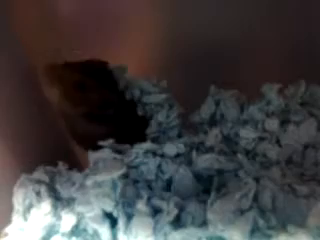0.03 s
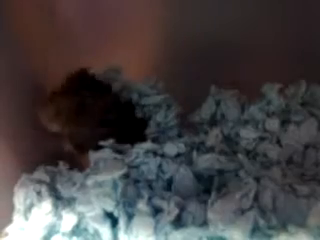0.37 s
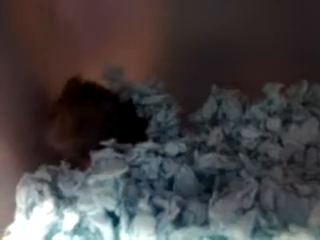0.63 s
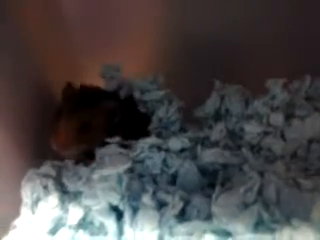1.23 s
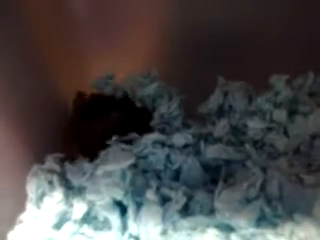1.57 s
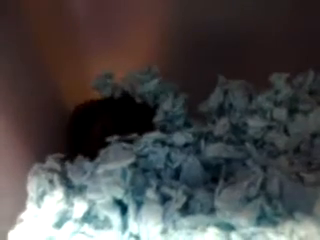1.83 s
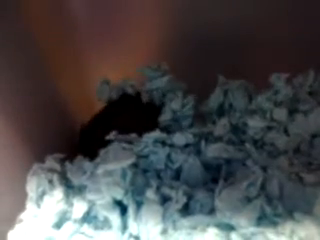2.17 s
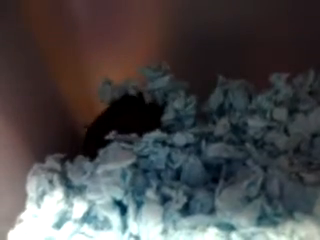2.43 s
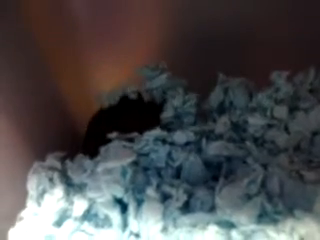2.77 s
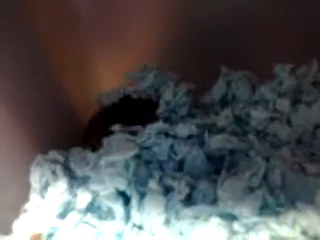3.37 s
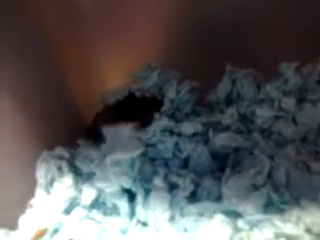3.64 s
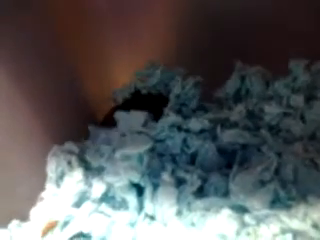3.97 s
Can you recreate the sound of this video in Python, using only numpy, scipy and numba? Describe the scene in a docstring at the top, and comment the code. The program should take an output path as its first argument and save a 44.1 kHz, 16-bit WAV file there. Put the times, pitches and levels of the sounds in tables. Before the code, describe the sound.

A hamster squawks nine times in quick succession, close to the microphone. The reedy calls crack into a rattle and grow duller and hoarser, the last one short. Tiny squeaky gasps fall between them in a quiet room.

```python
"""A hamster in paper bedding squawks nine times, close up; the later calls are duller and hoarser,
and the last is short. Its voice is a pulse train that breaks from a reedy tone into a slower rattle,
with air hissing once a cycle, shaped by its throat and mouth and by echoes off the near cage walls.
It squeaks briefly as it gasps between calls, over a quiet room."""
import sys
import numpy as np
from scipy import signal
from scipy.fft import rfft, irfft
from scipy.io import wavfile
from scipy.ndimage import uniform_filter1d
from numba import njit

SR = 44100
rng = np.random.default_rng(int(sys.argv[2]) if len(sys.argv) > 2 else 0)


def unload_audio(sound):
    """Save the sound as a 16-bit wav file, at the path given as the first command line argument."""
    columns = np.transpose(np.atleast_2d(sound))
    # keep every value between -1 and 1, then stretch to whole-number steps
    steps = np.round(np.clip(columns, -1, 1) * 32767)
    wavfile.write(sys.argv[1], SR, steps.astype(np.int16))


N = 176400
t = np.arange(N) / SR
TOP_HZ = 7350  # upper edge of the breath and of the whole mix


def undb(db):
    """Decibels to gain."""
    return 10 ** (np.asarray(db) / 20)


def unit(x):
    """Scale to rms 1."""
    return x / np.std(x)


def steady(x):
    """Ride the level to rms 1 over a sliding 12 ms."""
    return x / np.sqrt(uniform_filter1d(x * x, size=530) + 1e-12)


def wander(rate_hz):
    """Smooth random modulation, rms 1."""
    span = max(int(SR / rate_hz), 1)
    smoothed = uniform_filter1d(rng.standard_normal(N), span, mode="wrap")
    return unit(uniform_filter1d(smoothed, span, mode="wrap"))


def equalise(x, points):
    """Minimum-phase EQ through the given (Hz, dB) points."""
    hz, db = np.array(points, float).T
    bins_hz = np.maximum(np.fft.rfftfreq(N, 1 / SR), 1)
    gain = undb(np.interp(np.log(bins_hz), np.log(hz), db))
    cepstrum = irfft(np.log(gain))
    cepstrum[1:N // 2] *= 2
    cepstrum[N // 2 + 1:] = 0
    return irfft(rfft(x) * np.exp(rfft(cepstrum)))


def butter(x, hz, kind, order=2):
    """Low- or high-pass without delay."""
    return signal.sosfiltfilt(signal.butter(order, hz, kind, fs=SR, output="sos"), x)


@njit
def resonate(x, hz, width):
    """Swept band-pass, gain 1 at the centre."""
    y = np.empty(len(x))
    band_state, low_state = 0., 0.
    for i in range(len(x)):
        tuning, damping = np.tan(np.pi * hz[i] / SR), width[i] / hz[i]
        band = (band_state + tuning * (x[i] - low_state)) / (1 + tuning * (tuning + damping))
        band_state = 2 * band - band_state
        low_state += 2 * tuning * band
        y[i] = damping * band
    return y


# The tilt of the room tone. Each row: frequency in Hz, relative level in dB.
ROOM_EQ = [(25, 4.5), (155, -2), (220, -9), (700, -9), (7000, -45.5)]


def room(level_db=-51):
    """A faint bed of rumble and hiss."""
    return undb(level_db) * unit(equalise(rng.standard_normal(N), ROOM_EQ))


# The gasps around the calls. Each row: midpoint in seconds, length in seconds, pitch in Hz, level in dB.
GASPS = [(0.467, .013, 411, -32), (1.017, 0.025, 496, -27.5), (1.581, 0.056, 1050, -39),
         (1.582, 0.015, 320.4, -32.5), (2.007, 0.012, 524, -39), (2.5, 0.027, 549, -25.5),
         (2.894, 0.015, 577, -37), (3.911, .013, 741, -21.5), (3.933, .034, 1310, -40)]


def squeaks(arch=.22, fall=.08, jitter=.09, cutoff_hz=1210):
    """Each gasp is a brief, dull, hoarse chirp whose pitch arches and falls."""
    out = np.zeros(N)
    unrest = jitter * wander(470)
    for middle, length, hz, db in GASPS:
        position = 2 * (t - middle) / length
        near = np.abs(position) < 2
        bend = np.tanh(position[near])
        pitch = hz * (1 - arch * bend ** 2 - fall * bend + unrest[near])
        phase = 2 * np.pi * np.cumsum(pitch) / SR
        note = sum(np.cos(k * phase + k * k) / (1 + (k * hz / cutoff_hz) ** 4) for k in range(1, 10))
        envelope = np.exp(-position[near] ** 4 / 2)
        out[near] += undb(db) * unit(note) * envelope
    return out


def cage(x, echo_db=-7, decay_s=.0025):
    """The near walls add a spray of very short echoes that turns the upper overtones uneven."""
    age = t[:SR // 40]
    echoes = rng.standard_normal(len(age)) * np.exp(-age / decay_s)
    echoes = butter(echoes / np.linalg.norm(echoes), 2300, "high")
    return x + undb(echo_db) * signal.fftconvolve(x, echoes)[:N]


# The throat's resonances as an EQ curve. Each row: frequency in Hz, gain in dB.
THROAT_EQ = [(370, -18), (520, 4.5), (690, 13), (1120, 12.5), (1500, 8.5), (1740, -8.5), (1920, -0.5),
             (2330, -20), (3150, -11.5), (3600, -18.5), (6300, -20.5)]
# The mouth's shrill peak. Each row: time in seconds, centre in Hz, width in Hz, boost in dB.
MOUTH_SWEEP = [(0, 2930, 1500, 9), (.14, 3660, 1300, 14), (.33, 4500, 900, 1), (1.44, 5450, 400, 16),
               (1.698, 4550, 700, 13), (1.948, 4950, 750, 31), (2.3, 3320, 1800, 17.5),
               (3.42, 3730, 1490, 11)]


def vocal_tract(x):
    """Still throat resonances, then a shrill one that moves with the mouth."""
    times, hz, width, db = np.array(MOUTH_SWEEP, float).T
    throat = equalise(x, THROAT_EQ)
    shrill = resonate(throat, np.interp(t, times, hz), np.interp(t, times, width))
    return throat + (undb(np.interp(t, times, db)) - 1) * shrill


def larynx(hz, rough, wobble=.006, lurch=.085, jitter=.12, shimmer=.48, flicker_db=3.2):
    """Pulses and puffs of air; roughness unsettles each cycle's length and size and adds breath."""
    unrest = rough ** 1.5 * (lurch * wander(220) + jitter * wander(900))
    phase = 2 * np.pi * np.cumsum(hz * (1 + wobble * wander(90) + unrest)) / SR
    # Each overtone flickers on its own; the phase offsets smear each pulse over its cycle.
    overtones = sum(np.cos(k * phase + np.pi * k * k / 20) * undb(flicker_db * wander(64))
                    for k in range(2, 20))
    pulses = unit(np.cos(phase) + overtones)
    hiss = butter(rng.standard_normal(N), 3000, "high")
    puffs = unit(butter(hiss, TOP_HZ, "low")) * (1 + np.cos(phase) / 2)
    return pulses * (1 + rough * shimmer * wander(740)) + (.02 + .65 * rough) * puffs


# The reedy tone's melody. Each row: time in seconds, pitch in Hz.
TONE_PITCH = [(0, 546.7), (.05, 556.2), (.068, 502.8), (.21, 590), (.245, 636.6), (.405, 665),
              (.489, 500.2), (.538, 540.5), (.656, 537.7), (.712, 577), (.831, 537), (.921, 633.4),
              (.986, 606.2), (1.064, 541.3), (1.136, 630), (1.435, 663.2), (1.495, 607.6), (1.526, 664.4),
              (1.545, 601), (1.617, 512.1), (1.647, 615.6), (1.722, 572.4), (1.843, 564), (1.915, 661.8),
              (1.981, 652), (2.052, 565.8), (2.188, 544), (2.236, 615), (2.392, 630), (2.425, 694.2),
              (2.47, 644.6), (2.543, 490.3), (2.593, 556), (2.667, 508.2), (2.727, 536), (2.966, 539.4),
              (3.08, 504.2), (3.19, 585.2), (3.235, 581.4), (3.303, 489), (3.392, 522.6), (3.598, 511.6),
              (3.677, 595), (3.75, 514)]
# The rasp on that tone. Each row: time in seconds, roughness from 0 to 1.
TONE_RASP = [(.03, .15), (.13, .36), (.19, .17), (.68, .47), (1.17, .13), (1.44, .05), (1.48, .27),
             (1.8, .22), (2.15, .42), (2.25, .27)]
# Where the voice breaks into a rattle. Each row: start in seconds, end in seconds.
VOICE_BREAKS = [(.407, .425), (.905, .917), (.98, 1.068), (1.539, 1.63), (1.891, 1.901), (1.93, 1.952),
                (1.968, 2.085), (2.354, 2.366), (2.448, 2.563), (2.742, 2.8), (3.07, 3.108), (3.138, 3.166),
                (3.304, 3.425), (3.485, 3.555), (3.743, 3.93)]


def voice(crossfade_s=.005, ducked_gain=.45):
    """The tone ducks as a slower, uneven rattle breaks in; returns the sound and the rattle's fader."""
    hz = np.interp(t, *np.array(TONE_PITCH).T)
    rough = np.interp(t, *np.array(TONE_RASP).T)
    rattling = sum(np.clip(.5 + np.minimum(t - start, end - t) / crossfade_s, 0, 1)
                   for start, end in VOICE_BREAKS)
    tone = larynx(hz, rough) * (1 - (1 - ducked_gain) * rattling)
    rattle = rattling * larynx(hz=360, rough=.87)
    return tone + rattle, rattling


# The level curves of the nine calls, one list per call. Each row: time in seconds, then the levels
# in dB of the fundamental (before the rattle's boost), the low overtones and the treble.
CALL_LEVELS = [
    [(0, -33.5, -36, -27.5), (0.2, -27.5, -37, -27), (0.412, -22.5, -35, -31)],
    [(0.49, -32.0, -36.5, -31.5), (0.83, -30.0, -34.5, -32), (0.91, -24, -38, -31.5),
     (0.987, -25, -39.5, -30.5)],
    [(1.071, -29.5, -31, -30.5), (1.13, -25.5, -38.5, -30), (1.4, -22.5, -42, -31),
     (1.544, -27.5, -36.5, -28.5)],
    [(1.624, -29.5, -34, -34.5), (1.67, -25.0, -33, -27.5), (1.85, -30.5, -29, -37.5),
     (1.98, -23, -33.5, -42)],
    [(2.056, -32.5, -29.5, -52), (2.24, -28.0, -27, -39.5), (2.467, -27, -27, -31.5)],
    [(2.551, -36, -27, -32.5), (2.765, -36, -29.5, -42)],
    [(2.915, -35, -32.5, -49.5), (3.05, -39, -31.5, -51.5), (3.21, -30, -26, -44.5),
     (3.315, -35, -35, -51.5)],
    [(3.388, -32.5, -35, -40.5), (3.52, -37.5, -30.5, -52.5), (3.68, -31.5, -27, -44),
     (3.794, -34, -31, -52.5)],
    [(3.857, -35.5, -31.5, -53), (3.912, -48.5, -29.5, -49.5)],
]


def squawks(attack_s=.0063, release_s=.0045, crossovers_hz=(850, 2300), rattle_boost_db=2.5):
    """The hamster's calls start and stop abruptly, and each of three registers swells on its own curve."""
    source, rattling = voice()
    rest = cage(vocal_tract(source))
    bands = []
    for edge in crossovers_hz:
        bands.append(butter(rest, edge, "low", order=6))
        rest = rest - bands[-1]
    bands = [steady(band) for band in bands + [rest]]
    bands[0] *= undb(rattle_boost_db * rattling)
    out = np.zeros(N)
    for call in CALL_LEVELS:
        times, *levels = np.array(call).T
        attack = np.clip(1 + (t - times[0]) / attack_s, 0, 1)
        release = np.exp(-np.maximum(t - times[-1], 0) * 2 / release_s)
        blend = sum(band * undb(np.interp(t, times, db)) for band, db in zip(bands, levels))
        out += attack * release * blend
    return out


def scene():
    """The squawks up front, with the squeaks and room tone behind, in mono."""
    return (squawks() + squeaks() + room())[None]


def record(dry):
    """A narrow-band recorder cuts the top."""
    return signal.sosfilt(signal.ellip(10, .2, 70, TOP_HZ, fs=SR, output="sos"), dry)


dry = scene()
out = record(dry)
unload_audio(out)
```